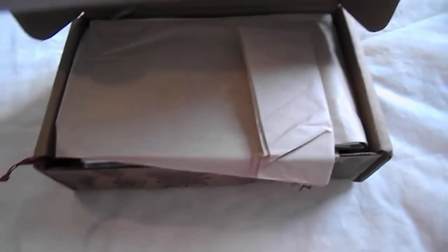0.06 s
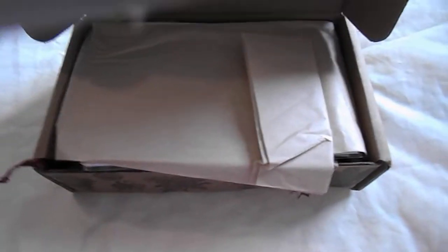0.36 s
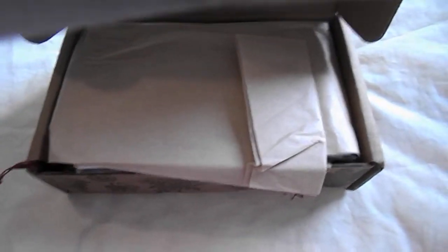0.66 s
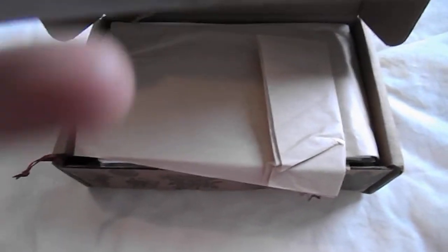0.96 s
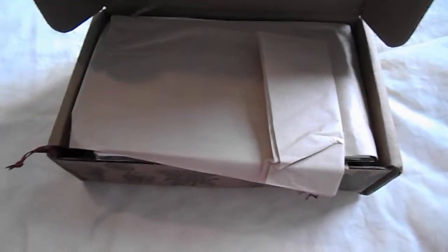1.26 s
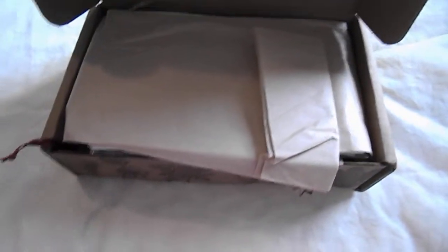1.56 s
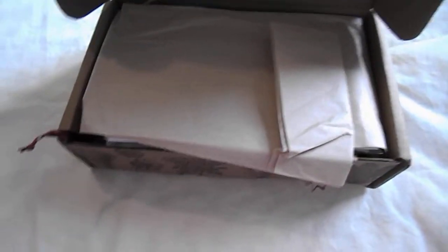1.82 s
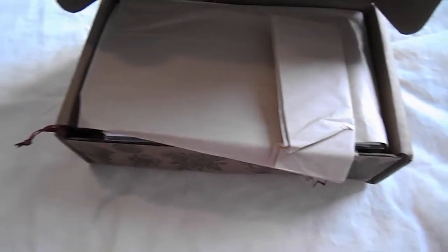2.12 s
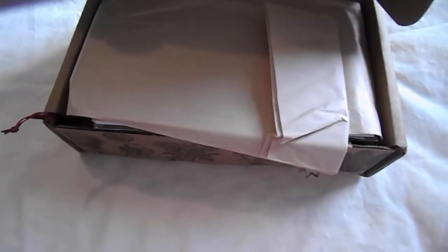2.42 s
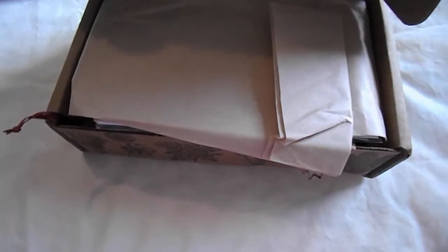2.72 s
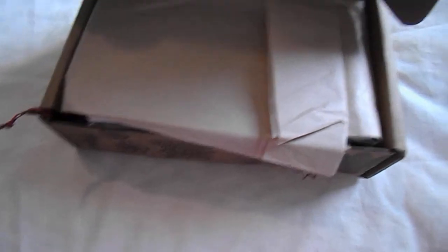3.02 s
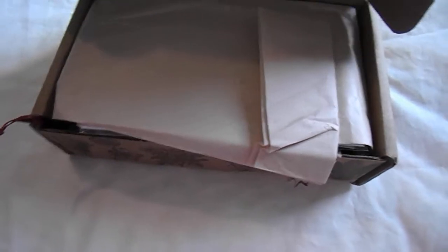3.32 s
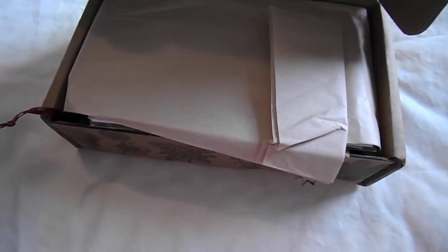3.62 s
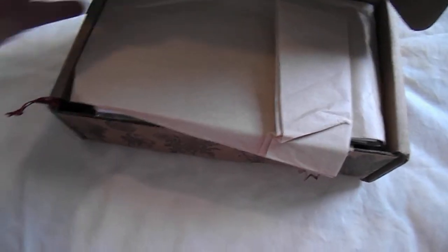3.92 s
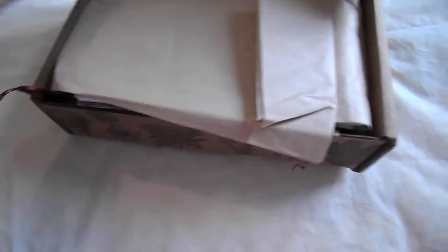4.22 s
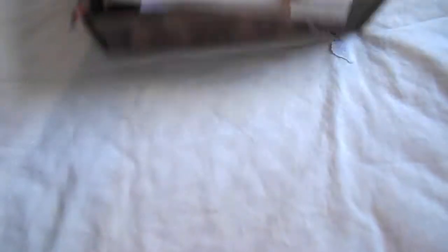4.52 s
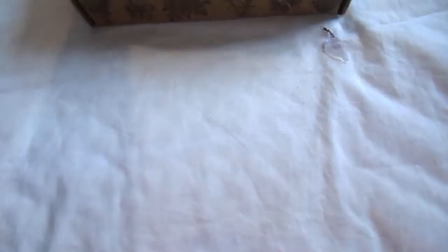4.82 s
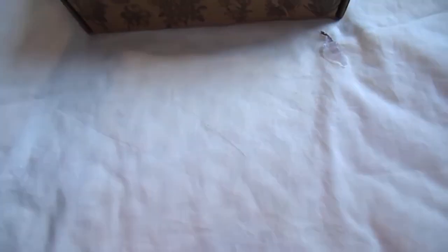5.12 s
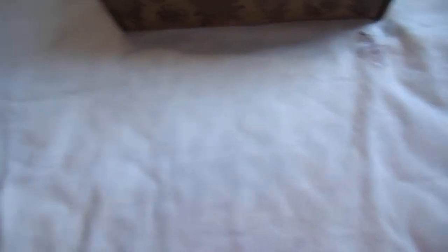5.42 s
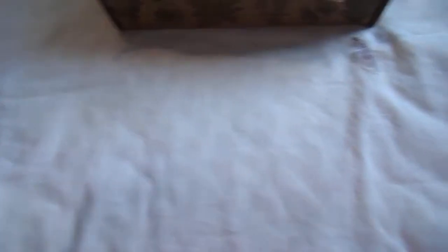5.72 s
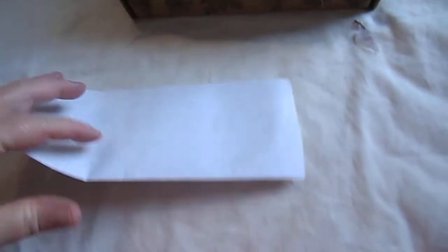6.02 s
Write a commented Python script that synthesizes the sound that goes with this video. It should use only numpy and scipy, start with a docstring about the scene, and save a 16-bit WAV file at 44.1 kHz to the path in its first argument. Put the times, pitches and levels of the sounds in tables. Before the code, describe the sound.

Tissue paper rustles and crackles in a cardboard box, a sheet slides out, and the box is softly nudged over cloth.

```python
"""Tissue paper rustles and crackles close by in a cardboard box on a bed; fingers knock the walls.
A sheet is drawn out, the box is pushed back over the bedsheet, the folded sheet is laid down and smoothed.
Rubbing is fibre micro-slips and buckling creases; paper edges scuff and squeak, creases pop,
and knocks ring the cardboard's damped modes. The room is small and quiet."""
import sys
import numpy as np
from scipy import signal
from scipy.fft import rfft, irfft, next_fast_len
from scipy.io import wavfile
from scipy.ndimage import uniform_filter1d

SR = 44100
rng = np.random.default_rng(int(sys.argv[2]) if len(sys.argv) > 2 else 0)


def store_pcm(level_fs):
    """Save levels as 16-bit WAV."""
    pcm = np.round(np.clip(level_fs, -1, 1) * 32767).astype(np.int16)
    wavfile.write(sys.argv[1], SR, np.atleast_2d(pcm).T)


N = 276066
TIME_S = np.arange(N) / SR
SLIDE_EDGES_HZ, SCUFF_EDGES_HZ = (20, 2800, 6500, 17000), (20, 900, 2800, 17000)


def amp(db):
    """Decibels to gain."""
    return np.exp(np.asarray(db) * (np.log(10) / 20))


def unit(x):
    """Scale to rms 1."""
    return x / np.sqrt(np.mean(x ** 2) + 1e-20)


def along(points, hz):
    """Interpolate (Hz, value) points on a log axis."""
    point_hz, values = np.transpose(points)
    return np.interp(np.log(hz + 1), np.log(point_hz + 1), values)


def wobble(rate_hz):
    """Random curve, rate_hz knots a second."""
    knots = rng.standard_normal(int(N * rate_hz / SR) + 4)
    return np.interp(TIME_S * rate_hz, np.arange(len(knots)), knots)


def samples(start_s, end_s):
    """Sample indices of an interval, clipped to the scene."""
    return np.arange(max(int(start_s * SR), 0), min(int(end_s * SR), N))


def filtered(x, response):
    """Apply a frequency response."""
    size = next_fast_len(N + SR // 10, real=True)
    return irfft(rfft(x, size) * response(np.fft.rfftfreq(size, 1 / SR)), size)[..., :N]


def panned(left_db):
    """Constant-power gains for a left-over-right level."""
    ratio = amp(np.atleast_1d(left_db))
    return np.array([ratio, np.ones_like(ratio)]) * np.sqrt(2 / (1 + ratio * ratio))


def from_right(x, lag_s):
    """The sound reaches the left channel later."""
    return filtered(x, lambda hz: np.exp(-2j * np.pi * hz * np.array([[lag_s], [0]])))


def stereo(pair, colour, coherence):
    """Colour two independent signals and blend them into left and right."""
    def response(hz):
        angle = np.arccos(np.clip(along(coherence, hz), -1, 1)) / 2
        return amp(along(colour, hz)) * [np.cos(angle), np.sin(angle)]
    mid, side = filtered(pair, response)
    return unit(np.array([mid + side, mid - side]))


def bands(x, edges_hz):
    """Split into adjacent bands, each of rms 1."""
    def response(hz):
        below = 1 / (1 + (hz / np.array(edges_hz)[:, None]) ** 16)
        return np.sqrt(np.abs(np.diff(below, axis=0)))[:, None]
    return [unit(band) for band in filtered(x, response)]


def burst(noise, envelope):
    """Enveloped noise with exactly the envelope's energy."""
    return unit(noise * envelope) * np.sqrt(np.mean(envelope ** 2))


# room noise spectrum: (frequency [Hz], relative level [dB])
HUSH_COLOUR = [(30, -50), (90, -28.5), (190, -12.5), (380, -5.5), (584, -6), (1250, -14.5), (16000, -25.5)]
# room noise width: (frequency [Hz], left-right coherence [0-1])
HUSH_COHERENCE = [(700, 0.59), (1300, 0.34), (3000, 0.023)]


def hush(level_db=-54):
    """Steady, low room noise."""
    return amp(level_db) * stereo(rng.standard_normal((2, N)), HUSH_COLOUR, HUSH_COHERENCE)


# room decay: (frequency [Hz], t60 [s])
ROOM_DECAY = [(200, 0.37), (2000, 0.16), (12000, 0.31)]


def reverb(x):
    """Short diffuse tail off the walls; dies fastest near 2 kHz."""
    hz, t, spectrum = signal.stft(rng.standard_normal((2, SR // 3)), SR, nperseg=256)
    decay = amp(-60 * t / along(ROOM_DECAY, hz)[:, None])
    tail = signal.istft(spectrum * decay, SR, nperseg=256)[1]
    return signal.fftconvolve(x, tail / np.linalg.norm(tail[0]), axes=1)[:, :N]


def fibres(grain_db, crinkles_per_s, crinkle_db):
    """Dense fibre micro-slips, plus creases buckling in crunches of about 1 ms."""
    slips = unit(rng.standard_normal((2, N)) * amp(grain_db * wobble(1400)))
    buckles = (rng.random(N) < crinkles_per_s / SR) * rng.random(N)
    crunch = signal.lfilter([1], [1, -np.exp(-1 / (.0005 * SR))], buckles)
    return slips + amp(crinkle_db) * unit(crunch * rng.standard_normal((2, N)))


def bending(x, depth_db):
    """A bending sheet keeps shifting its resonances."""
    spectrum = signal.stft(x, nperseg=512)[2]
    patches = uniform_filter1d(rng.standard_normal(spectrum.shape[1:]), size=5, axis=0)
    patches = unit(uniform_filter1d(patches, size=7, axis=1))
    return unit(signal.istft(spectrum * amp(depth_db * patches), nperseg=512)[1][:, :N])


def strokes(rows, rise_s, fall_s, arch_db):
    """Body, rustle and hiss gains as strokes grip and let go; arch_db is the middle over the ends."""
    power = np.zeros((3, N))
    for start_s, length_s, db, swell_db, body_db, hiss_db in rows:
        span = samples(start_s - .1, start_s + length_s + .1)
        t = span / SR - start_s
        position = np.clip(2 * t / length_s - 1, -1, 1)
        contact = (1 + np.tanh(t / rise_s)) / 2 * (1 + np.tanh((length_s - t) / fall_s)) / 2
        gain = contact * amp(db + swell_db * position / 2 - arch_db * position ** 2)
        power[:, span] += (gain * amp([[body_db], [0], [hiss_db]])) ** 2
    return np.sqrt(power)


# width of rubbing surfaces: (frequency [Hz], left-right coherence [0-1])
RUB_COHERENCE = [(200, 0.69), (800, 0.83), (1600, 0.82), (2600, 0.13), (4200, 0.32), (6000, 0.011),
                 (12000, 0.04)]


def slide(gains, colour, slips, judder_db, flutter_db, body_left_db, hiss_left_db,
          coherence=RUB_COHERENCE):
    """Slips radiate in three bands; uneven hand speed shakes all, the low body also flutters alone."""
    body, rustle, hiss = bands(stereo(slips, colour, coherence), SLIDE_EDGES_HZ)
    body_gain, rustle_gain, hiss_gain = gains
    body = body * unit(amp(flutter_db * wobble(110))) * body_gain * panned(body_left_db)
    rustle = rustle * rustle_gain * panned(0.45 * (body_left_db + hiss_left_db))
    hiss = hiss * hiss_gain * panned(hiss_left_db)
    return (body + rustle + hiss) * unit(amp(judder_db * wobble(70)))


# cardboard on cloth: (frequency [Hz], relative level [dB])
CLOTH_COLOUR = [(60, -60), (199, -13.5), (687, -6.5), (1050, -13.5), (1550, -10), (2300, -17.5), (4400, -9),
                (6000, -12.5), (9500, -4), (16000, -13)]
# pushes: (start [s], length [s], rustle [dB], swell [dB], body re rustle [dB], hiss re rustle [dB])
BOX_PUSHES = [(3.984, 0.085, -48, -3, -0.5, 1), (4.05, 0.3, -59.5, 0, 6, 1),
              (4.26, 0.19, -51.5, 3.5, 1, 2.5), (4.44, 0.1, -51, 13, 3.5, 5.9),
              (4.535, 0.069, -49, 1, 0.5, 3.4), (4.6, 0.15, -54, 1, 1.5, 1), (4.83, 0.15, -62, -2, 6.5, 2),
              (5.062, 0.028, -49, 1, 2.5, 5.4), (5.165, 0.042, -54.5, 4, -4, 10)]


def box_push():
    """The box rubs over the bedsheet in short nudges."""
    slips = fibres(grain_db=1.5, crinkles_per_s=130, crinkle_db=-18)
    gains = strokes(BOX_PUSHES, rise_s=0.0044, fall_s=0.018, arch_db=0.7)
    return slide(gains, CLOTH_COLOUR, slips,
                 judder_db=1.56, flutter_db=1, body_left_db=-1, hiss_left_db=5.5)


# folded paper: (frequency [Hz], relative level [dB])
FOLDED_COLOUR = [(47, -58), (80, -30), (386, -2), (877, -6), (1150, -11.5), (1750, -4), (2900, -17.5),
                 (6500, -17.5), (10500, -11.5), (16000, -21)]
# strokes: (start [s], length [s], rustle [dB], swell [dB], body re rustle [dB], hiss re rustle [dB])
SHEET_SKIDS = [(5.53, 0.022, -45.5, -5, 0, 2.9), (5.554, 0.12, -40, -2, 0.5, 3.7),
               (5.684, 0.075, -45.5, -10.5, -0.5, 8)]
SMOOTHING_STROKES = [(5.933, 0.046, -54.5, -5, 10.5, 7.9), (5.975, 0.14, -55, 3, -17, 1.8),
                     (6.214, 0.038, -50.5, -12.5, -4, 1.6)]


def folded_sheet():
    """The folded sheet skids onto the bed, then fingers smooth it."""
    slips = bending(fibres(grain_db=0.8, crinkles_per_s=90, crinkle_db=-13.5), depth_db=2)
    skid_gains = strokes(SHEET_SKIDS, rise_s=0.0085, fall_s=0.0064, arch_db=-1.4)
    skid = slide(skid_gains, FOLDED_COLOUR, slips,
                 judder_db=-0.5, flutter_db=3.5, body_left_db=-6.5, hiss_left_db=-3)
    smoothing_gains = strokes(SMOOTHING_STROKES, rise_s=0.011, fall_s=0.037, arch_db=-7)
    smoothing = slide(smoothing_gains, FOLDED_COLOUR, slips,
                      judder_db=1, flutter_db=10.5, body_left_db=-2.5, hiss_left_db=4.5)
    return from_right(skid, lag_s=.00008) + smoothing


# cardboard modes: (frequency [Hz], relative level [dB], base t60 [s])
BOX_MODES = [(221, -2.5, 0.048), (300.5, 4, 0.047), (363, -1.5, 0.074), (488, 1, 0.045), (638, 8.5, 0.022),
             (840, -1, 0.043), (1340, 7.5, 0.018), (1670, 7.5, 0.029), (2000, 8, 0.016)]
# knocks on the box, from fingers or, near 4.0-4.4 s, from the box bumping as it rocks on the bed: (time [s],
# thud [dB], clack [dB], left over right [dB], ring time factor [x])
KNOCKS = [(0.205, -33, -42, -8, 0.88), (0.683, -41.5, -70, -14, 0.6), (0.741, -31.5, -62, -15, 0.36),
          (0.767, -33.5, -43, -6, 0.28), (1.09, -40.5, -79, -5, 0.67), (1.665, -35, -44, 3, 0.9),
          (1.716, -25, -20, -5, 0.83), (1.7722, -23.5, -40, 0, 0.6), (1.995, -39.5, -68, -3, 1.6),
          (2.301, -38.5, -51, 3, 0.81), (3.0525, -32.5, -30.5, -4, 1.1), (3.0735, -21, -35.5, -8.5, 0.51),
          (4.009, -43.5, -49, -2, 1.9), (4.314, -37.5, -46.5, -1.5, 1.8), (4.407, -33, -44, -1, 1.8),
          (5.568, -34, -29.5, -12, 0.92)]


def box_knocks(firm_db=-33, soft_db=37, soft_attack_s=0.007, focus_db_per_oct=7, crack_t60_s=0.018):
    """Knocks ring the hand-damped cardboard; hard ones crack, soft ones reach mainly the low modes."""
    out, t = np.zeros((2, N + SR)), np.arange(SR // 6) / SR
    hz, mode_db, t60_s = np.transpose(BOX_MODES)[:, :, None]
    low = hz[:, 0] < 900
    unit_onset = lambda x: x / np.sqrt(np.mean(x[:, :SR // 125] ** 2))  # rms 1 over the first 8 ms
    crack_band = signal.butter(2, [2200, 6500], "band", fs=SR, output="sos")
    for time_s, thud_db, clack_db, left_db, ring in KNOCKS:
        phase = rng.uniform(0, 2 * np.pi, hz.shape) + 0.52 * rng.standard_normal((2, *hz.shape))
        tilt_db = 0.11 * (clack_db - firm_db) * np.log2(hz / hz[0])
        level_db = mode_db + tilt_db + 2 * rng.standard_normal(hz.shape)
        gripped_hz = hz * np.exp(0.03 * rng.standard_normal(hz.shape))  # the grip detunes the panels
        # rocking free, the box rings longer and favours its main mode
        level_db -= focus_db_per_oct * max(ring - 1, 0) * np.abs(np.log2(hz / hz[1]))
        softness = np.clip((thud_db - clack_db) / soft_db, 0, 1) ** 2  # 1 = slow finger-pad press
        envelopes = amp(level_db - 60 * t / ((ring + softness) * t60_s))
        modes = envelopes * np.sin(2 * np.pi * gripped_hz * t + phase)
        thud = modes[:, low].sum(1) * (1 - np.exp(-t / (0.00018 + softness * soft_attack_s)))
        clack = modes[:, ~low].sum(1) * (1 - np.exp(-t / 0.0004))
        crack = signal.sosfilt(crack_band, rng.standard_normal((2, len(t))) * amp(-60 * t / crack_t60_s))
        knock = amp(thud_db) * unit_onset(thud) + amp(clack_db) * unit_onset(clack)
        knock += amp(1.1 * clack_db - 6) * unit_onset(crack)
        out[:, round(time_s * SR):][:, :len(t)] += knock * panned(left_db)
    return out[:, :N]


# edge resonances: (peak time [s], sigma [s], frequency [Hz], half width / frequency [x], level [dB])
EDGE_SQUEAKS = [(0.196, 0.0028, 1420, 0.2, -32), (0.213, 0.0083, 720, 0.24, -34),
                (0.598, 0.011, 1900, 0.15, -31.5), (1.783, 0.0068, 1347, 0.22, -20.5),
                (2.942, 0.0042, 2003, 0.19, -18.5), (3.083, 0.0098, 1204, 0.24, -37.5),
                (3.993, 0.0054, 4790, 0.075, -43), (4.154, 0.0063, 1380, 0.074, -49),
                (4.52, 0.014, 780, 0.08, -45.5), (4.593, 0.0071, 680, 0.07, -42.5),
                (5.076, 0.012, 1750, 0.18, -45), (5.19, 0.019, 1588, 0.096, -46),
                (5.727, 0.014, 11800, 0.13, -31)]


def edge_squeaks(left_db=-5):
    """Irregular slips feed one resonance of a free edge: narrow squeaks, wide rasps."""
    out, t = np.zeros((2, N)), np.arange(SR // 6) / SR - 1 / 12
    for peak_s, sigma_s, hz, width, db in EDGE_SQUEAKS:
        lowpass = signal.butter(2, width * hz, fs=SR, output="sos")
        drive = signal.sosfilt(lowpass, rng.standard_normal((2, len(t))))
        phase = 2 * np.pi * hz * t
        tone = drive[0] * np.cos(phase) + drive[1] * np.sin(phase)
        envelope = amp(db) * np.exp(-.5 * (t / sigma_s) ** 2)
        out[:, round((peak_s + t[0]) * SR):][:, :len(t)] += burst(tone, envelope)
    return out * panned(left_db)


# scuff and snap spectrum: (frequency [Hz], relative level [dB])
CRACKLE_COLOUR = [(60, -38), (150, -16), (240, -4), (400, -1.5), (920, -9), (1500, -1), (3100, -14),
                  (4500, -6.5), (11000, -5.5), (16000, -16)]
# width of paper edges and creases: (frequency [Hz], left-right coherence [0-1])
EDGE_COHERENCE = [(200, 0.72), (1600, 0.74), (5000, 0.75), (8000, 0.044)]
# catches: (peak time [s], body [dB], hiss [dB], left over right [dB], rise [s/20 dB], fall [s/20 dB])
EDGE_SCUFFS = [(0.0686, -30, -16, -1.5, 0.0053, 0.0054), (0.196, -33.5, -21, 7, 0.0027, 0.0078),
               (0.738, -39, -33, -1, 0.0058, 0.041), (1.561, -33, -22.5, 4, 0.0047, 0.0089),
               (1.766, -26.5, -11.5, 9, 0.0067, 0.003), (1.774, -19, -16.5, -1, 0.0063, 0.016),
               (2.126, -36.5, -41, 1.5, 0.021, 0.026), (2.1988, -36, -21.5, 9, 0.001, 0.0037),
               (2.864, -31, -50, -6, 0.041, 0.017), (2.908, -31, -41, -6, 0.002, 0.029),
               (2.942, -27, -12.5, -3, 0.013, 0.017), (3.077, -32, -36.5, -2, 0.0085, 0.032),
               (3.116, -51, -50.5, -3, 0.011, 0.096), (4.233, -45, -41.5, -2, 0.003, 0.032),
               (5.555, -38.5, -30, 9, 0.0015, 0.018), (5.571, -27.5, -35, -5, 0.009, 0.012),
               (6.241, -43, -45, -1, 0.011, 0.015)]


def edge_scuffs(hiss_left_db=5, bass_stretch=1.81, mid_db=1):
    """A paper edge drags ever harder, then slips free; the bass lingers longest."""
    slips = fibres(grain_db=3.8, crinkles_per_s=880, crinkle_db=-6.5)
    low, mid, high = bands(stereo(slips, CRACKLE_COLOUR, EDGE_COHERENCE), SCUFF_EDGES_HZ)
    out = np.zeros((2, N))
    for peak_s, body_db, hiss_db, left_db, rise_s, fall_s in EDGE_SCUFFS:
        span = samples(peak_s - .1, peak_s + .2)
        t = span / SR - peak_s
        drop_db = 20 * np.where(t < 0, -t / rise_s, t / fall_s)
        body = burst(low[:, span], amp(body_db - drop_db / bass_stretch))
        body += burst(mid[:, span], amp(body_db + mid_db - drop_db))
        hiss = burst(high[:, span], amp(hiss_db - drop_db))
        out[:, span] += body * panned(left_db) + hiss * panned(left_db + hiss_left_db)
    return out


# crease pops: (time [s], click [dB], body re click [dB])
CREASE_SNAPS = [(0.114, -32, -21), (0.2056, -19, -3), (0.7677, -31, -4), (1.7163, -12.5, 3),
                (1.7583, -23, -12), (1.91, -28, -7.5), (5.516, -38, -12), (5.568, -26.5, 11.5),
                (6.135, -33, -9)]


def crease_snaps(fall_s=0.0024, left_db=5):
    """A crease pops over: a dry click, gone in a few milliseconds."""
    out, t = np.zeros((2, N)), np.arange(SR // 50) / SR
    noise = stereo(rng.standard_normal((2, N)), CRACKLE_COLOUR, EDGE_COHERENCE)
    _, mid, high = bands(noise, SCUFF_EDGES_HZ)
    for time_s, click_db, body_db in CREASE_SNAPS:
        span = round(time_s * SR) + np.arange(len(t))
        envelope = amp(click_db - 20 * t / fall_s)
        click = burst(high[:, span], envelope) * panned(left_db)
        out[:, span] += click + burst(mid[:, span], envelope * amp(body_db))
    return out


# paper on cardboard: (frequency [Hz], relative level [dB])
PULL_COLOUR = [(60, -39), (170, -15.5), (380, 2), (720, 0), (1050, -7), (1720, 4), (2850, -9), (4150, 3),
               (4900, 4), (5800, -3.5), (10000, -3.5), (16000, -13.5)]
# pull strength: (time [s], rustle [dB])
PULL_CURVE = [(2.428, -52), (2.438, -27), (2.52, -32), (2.57, -27), (2.74, -24), (2.83, -25), (2.88, -38),
              (2.955, -34.5), (3.015, -44), (3.038, -61)]


def sheet_pull(body_db=-0.8, hiss_db=2.5, hiss_limit_db=-29.5, freeing_db_per_s=3):
    """A sheet drags along the cardboard; the hiss levels off under hard pull, freed length adds body."""
    knots_s, pull_db = np.transpose(PULL_CURVE)
    pull = amp(np.interp(TIME_S, knots_s, pull_db, left=-120, right=-120))
    body = pull * amp(body_db + freeing_db_per_s * (TIME_S - knots_s.mean()))
    hiss = pull * amp(hiss_db)
    hiss /= np.hypot(1, hiss / amp(hiss_limit_db))
    slips = bending(fibres(grain_db=1.6, crinkles_per_s=400, crinkle_db=-10), depth_db=1.3)
    return slide((body, pull, hiss), PULL_COLOUR, slips, coherence=EDGE_COHERENCE,
                 judder_db=0.55, flutter_db=1.26, body_left_db=-4.5, hiss_left_db=6.5)


# rubbed tissue: (frequency [Hz], relative level [dB])
RUSTLE_COLOUR = [(35, -62), (60, -35), (180, -8), (308, -1), (968, -6.5), (1620, -1), (2710, -7), (3940, 5),
                 (6900, 2.5), (9350, 9.5), (12400, 1.5), (16000, -2.5)]
# strokes: (start [s], length [s], rustle [dB], swell [dB], body re rustle [dB], hiss re rustle [dB])
FINGER_STROKES = [(-0.03, 0.16, -43, -4.5, 4.5, 10.5), (0.15, 0.11, -45, -1.5, 0, 5.5),
                  (0.265, 0.051, -40.5, 2.5, -8, 10.5), (0.362, 0.034, -44, 5, 2.5, 4),
                  (0.395, 0.11, -36.5, -1.5, -1.5, 2.5), (0.468, 0.053, -31.5, 8.5, -1, -8),
                  (0.526, 0.033, -32, 3, -3, -4), (0.563, 0.047, -26.5, -1, -8, -7.5),
                  (0.612, 0.041, -35, 4.5, -5, 0), (0.683, 0.04, -43.5, 2, -7, 5),
                  (0.765, 0.18, -42.5, 7, -12.5, 0.5), (0.96, 0.056, -41, -1, 0.5, 5),
                  (1.02, 0.2, -47, 9, -6.5, 1.5), (1.142, 0.068, -38, 4, -1, 2),
                  (1.21, 0.12, -45.5, 8, 6.5, 3), (1.33, 0.14, -36, 7, -3, 3),
                  (1.475, 0.06, -40, 1, -1.5, 1.5), (1.535, 0.054, -32.5, 0.5, -2.5, 0.5),
                  (1.6, 0.097, -36, -4.5, -7, 5.5), (1.757, 0.046, -30, -6.5, 0.5, 0),
                  (1.863, 0.11, -42, 0.5, -11, 7), (1.98, 0.036, -47.5, 0, 3, 2),
                  (2.046, 0.022, -38.5, 5, 1, 1.5), (2.08, 0.06, -41.5, 13, -9, 0),
                  (2.117, 0.13, -41.5, 8.5, -3, 6.5), (2.26, 0.092, -44.5, 11, -7.5, -1),
                  (2.34, 0.089, -45, 3, -9, 0.5)]


def tissue_rustle(resting_db=-52):
    """Fingers stroke the tissue; until the pull, the resting hand stirs it between strokes."""
    slips = bending(fibres(grain_db=2.2, crinkles_per_s=220, crinkle_db=-8), depth_db=1.6)
    resting = amp(resting_db) * (TIME_S < PULL_CURVE[1][0])
    stroking = strokes(FINGER_STROKES, rise_s=0.005, fall_s=0.009, arch_db=-0.24)
    return slide(np.hypot(resting, stroking), RUSTLE_COLOUR, slips,
                 judder_db=0.8, flutter_db=0, body_left_db=-2.5, hiss_left_db=7)


def scene():
    """Paper and box close by, over the room's hush."""
    rubbing = box_push() + folded_sheet() + sheet_pull() + tissue_rustle()
    transients = box_knocks() + edge_squeaks() + edge_scuffs() + crease_snaps()
    bass_cut = signal.butter(3, 140, "high", fs=SR, output="sos")  # small panels radiate little bass
    handling = rubbing + signal.sosfilt(bass_cut, transients)
    return hush() + amp(-17) * reverb(handling) + handling


def record(dry, bass_hz=60, ceiling=0.9, top_hz=15800):
    """The camera thins the deep bass, rounds the highest peaks and limits the band."""
    thin = signal.sosfilt(signal.butter(2, bass_hz, "high", fs=SR, output="sos"), dry)
    rounded = thin / (1 + np.abs(thin / ceiling) ** 6) ** (1 / 6)
    return filtered(rounded, lambda hz: hz < top_hz)


dry = scene()
out = record(dry)
store_pcm(out)
```